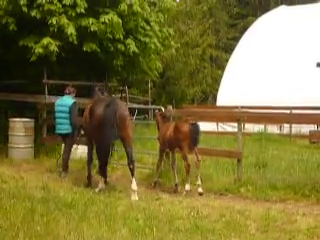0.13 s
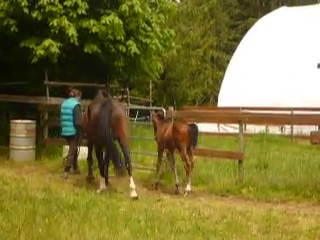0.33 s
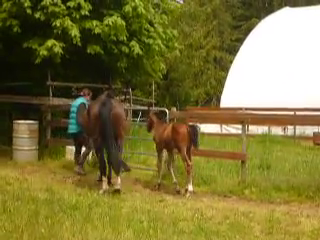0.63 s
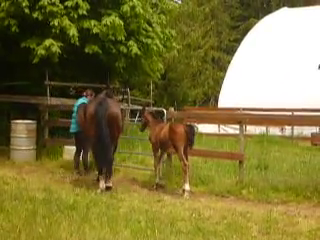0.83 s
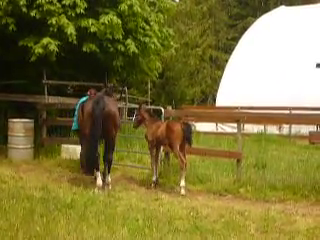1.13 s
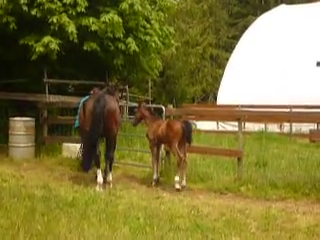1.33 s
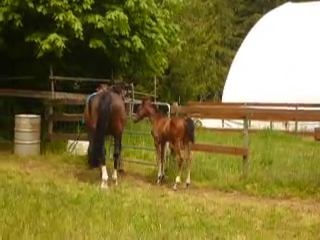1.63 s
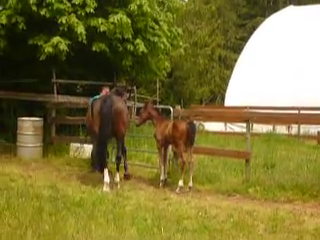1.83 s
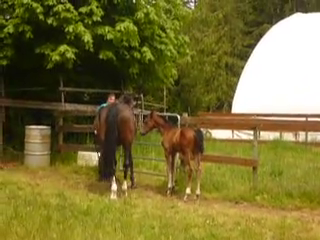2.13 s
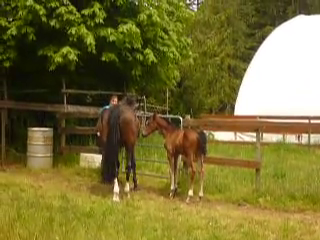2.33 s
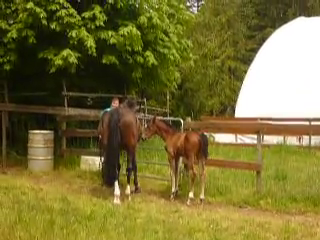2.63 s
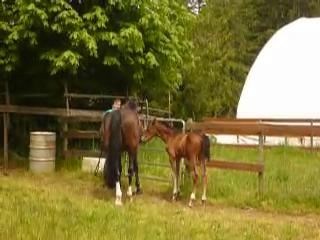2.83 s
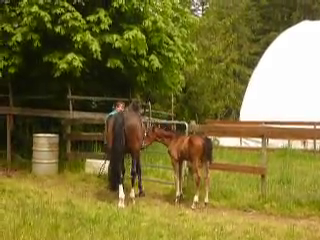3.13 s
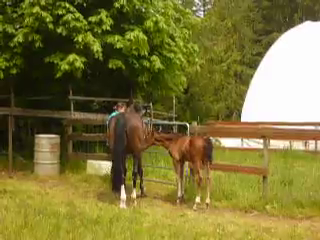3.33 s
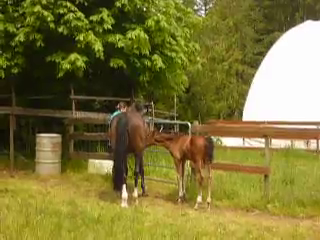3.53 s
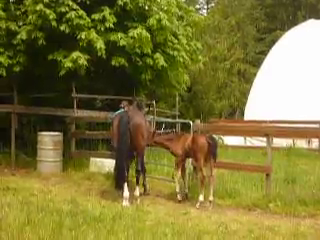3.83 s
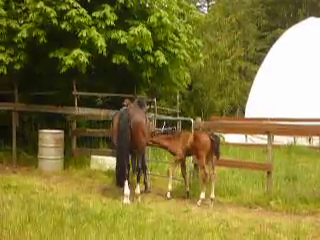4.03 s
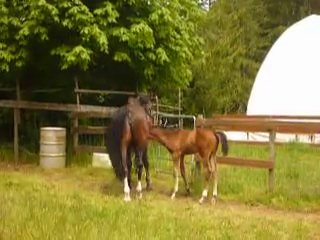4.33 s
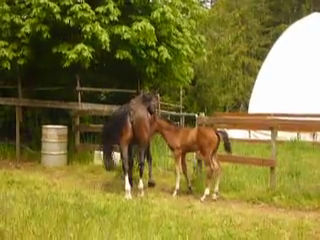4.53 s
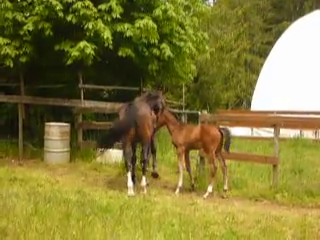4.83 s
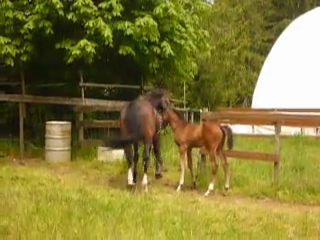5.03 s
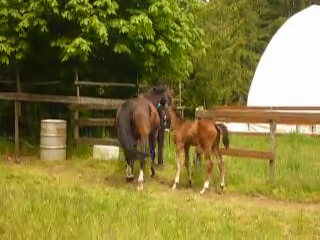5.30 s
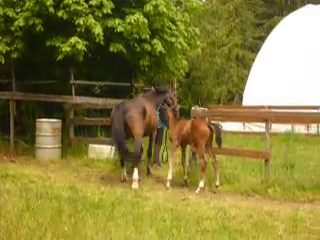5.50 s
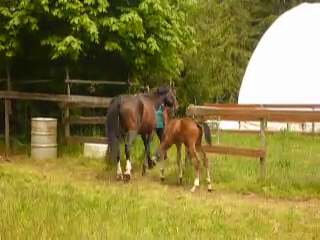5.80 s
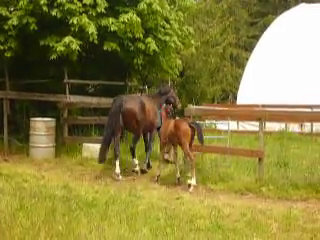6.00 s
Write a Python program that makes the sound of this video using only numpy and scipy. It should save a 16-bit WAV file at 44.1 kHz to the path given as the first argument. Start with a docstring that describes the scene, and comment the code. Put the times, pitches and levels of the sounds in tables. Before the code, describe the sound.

Over steady outdoor hush, two shrill, raspy, shaking horse whinnies sound, with a chain and pipe gate rattling between them and a soft blow last.

```python
"""Over a steady hush of coloured noise, a horse whinnies: a sine squeal over rasping vocal-fold pulses,
both quavering about eight times a second and running out in a slow growl. Sharp ringing ticks follow,
then a gate rattles as noise bursts ring its pipes, with a thin noise hiss running on into a second whinny.
Dull noise knocks fall within that whinny, two more ticks near its end, and last a soft blow of shaped noise.
It is a paddock with thin reflections, heard through a small mono camera microphone."""
import sys
import numpy as np
from scipy import signal
from scipy.fft import rfft, irfft
from scipy.io import wavfile
from scipy.ndimage import uniform_filter1d

SR = 44100
rng = np.random.default_rng(int(sys.argv[2]) if len(sys.argv) > 2 else 0)


def output_pcm(signal):
    """Save a mono or channel-first signal as 16-bit PCM at the path in sys.argv[1].

    Samples are clipped to [-1, 1] before scaling.
    """
    pcm = np.clip(np.atleast_2d(signal).T, -1, 1) * 32767
    wavfile.write(sys.argv[1], SR, np.round(pcm).astype(np.int16))


N = 271700
TIME = np.arange(N) / SR

# In the tables, dB in a colour is relative; other levels are set before trims, swells and the microphone.
# colour of the outdoor hush: f/Hz, level/dB
HUSH_COLOUR = [(28, -51), (50, -36), (90, -24), (130, -14), (200, -5), (340, 1.5), (500, 3), (950, 1),
               (1650, -3), (2400, -5.5), (3600, -6), (5500, -10.5), (7200, -10.5), (8600, -29.5)]
# envelope of the thin hiss: t/s, level/dB
HISS_ENVELOPE = [(2.22, -82), (2.27, -52.5), (2.6, -49.5), (2.95, -50), (3.2, -58), (3.35, -60)]
# colour of the thin hiss: f/Hz, level/dB
HISS_COLOUR = [(60, -54), (1000, -22), (2000, 1.5), (2900, -21), (3800, -4.5), (4500, 0.5), (5050, 0.5),
               (5500, -10), (7000, -34)]
# envelope of the soft blow through the nostrils: t/s, level/dB
BLOW_ENVELOPE = [(5.88, -79), (5.93, -48.5), (5.97, -42.5), (6.01, -44.5), (6.06, -46), (6.16, -46.5)]
# colour of the blow: f/Hz, level/dB
BLOW_COLOUR = [(50, -54), (300, -15), (750, -8.5), (1350, -2), (1700, -10), (2280, 2), (2900, -5),
               (3330, 4.5), (3850, 1.5), (4200, -5), (4600, 1), (5000, -4), (6600, -7.5), (7600, -28)]
# sharp ticks near the microphone: t/s, peak level/dB, centre f/Hz
TICKS = [(1.5625, -37, 6000), (1.703, -25, 5000), (1.721, -21, 5630), (1.7482, -28, 4340),
         (1.7788, -32, 4600), (1.7867, -26.5, 4630), (2.5702, -35, 5900), (5.2057, -21, 6500),
         (5.3581, -28.5, 5810)]
# dull knocks: t/s, level/dB, body decay/s, thump level against the body/dB
KNOCKS = [(3.845, -32, 0.011, -8), (3.859, -39, 0.0072, -9), (3.877, -28, 0.0085, -2.5),
          (3.885, -32.5, 0.0078, -19), (3.893, -33, 0.0068, -23), (3.931, -31.5, 0.0082, -29)]
# colour of the knock body: f/Hz, level/dB
KNOCK_BODY = [(50, -66), (300, -36), (650, -15), (950, 6), (1150, -4), (1600, -1.5), (2300, -8.5),
              (3400, -5.5), (5000, -19.5), (8000, -43)]
# colour of the low thump: f/Hz, level/dB
KNOCK_THUMP = [(40, -53), (120, -42), (200, -1), (420, 0.5), (700, 1), (1500, -26), (6000, -45)]
# gate shaken on its chain: t/s, level/dB, rise/s, decay/s
RATTLES = [(1.789, -45.5, 0.0055, 0.028), (1.86, -41.5, 0.0084, 0.052), (2.301, -44.5, 0.0038, 0.037),
           (2.36, -44, 0.0083, 0.022), (2.4, -37.5, 0.0037, 0.019), (2.48, -47, 0.02, 0.064),
           (2.55, -50.5, 0.0079, .06), (2.773, -43.5, 0.0026, 0.042), (2.835, -40.5, 0.007, 0.054)]
# ringing modes of the gate pipes: f/Hz, t60/s, level/dB
GATE_MODES = [(860, .08, -4), (1310, .1, -4), (1880, .16, -3), (2270, .1, -4), (2650, .16, -4),
              (3280, .32, -3), (3900, .08, -8), (4450, .08, -8)]
# colour of the chain: f/Hz, level/dB
CHAIN_COLOUR = [(50, -52), (200, -26.5), (600, -2.5), (1000, 3), (1500, -0.5), (2200, 4), (3200, 5.5),
                (4600, -1.5), (5400, -2), (7000, -34.5)]
# throat and nose resonances of each whinny: f/Hz, level/dB
FIRST_THROAT = [(40, -60), (90, -31), (170, -22), (300, -28), (600, -25.5), (850, -15.5), (1050, -10),
                (1270, 4), (1550, 3), (1800, 5), (2100, -1.5), (2350, -13), (2580, -6.5), (6000, -48)]
SECOND_THROAT = [(40, -67), (150, -18.5), (300, -30), (500, -13.5), (700, -19.5), (850, -13.5),
                 (1060, -17.5), (1260, 4), (1450, -0.5), (1850, 1), (2080, -1.5), (2280, -3), (2450, -33),
                 (6000, -45.5)]
# rush of air in the nostrils: f/Hz, level/dB
FIRST_AIR = [(60, -65), (1500, -32), (2600, 0), (3150, 4), (3400, -4), (3700, 3), (4000, -9.5), (4400, 5),
             (4780, -12), (5000, -2), (5350, -3.5), (5720, -6), (6000, -20), (7500, -54)]
SECOND_AIR = [(60, -67), (1500, -39), (2700, -2.5), (3150, 2), (3450, 8.5), (3700, 6), (4250, -4),
              (4950, 1), (5400, -8), (5750, -14), (6250, -8), (6800, -10.5), (7300, -9), (8500, -28.5)]
# slow growl as each whinny runs out: t/s, mean pulse f/Hz, level/dB
FIRST_GROWL = [(.8, 170, -50), (1.06, 149.3, -51), (1.19, 110.3, -49.5), (1.245, 105, -42.5),
               (1.31, 93.5, -49.5), (1.37, 96.4, -44.5), (1.44, 85.4, -60)]
SECOND_GROWL = [(4.3, 189.5, -53.5), (4.85, 165, -47.5), (5.15, 155.7, -43.5), (5.29, 164.3, -45.5),
                (5.335, 168.4, -49), (5.365, 175, -43), (5.4, 180, -40), (5.44, 159, -45.5),
                (5.49, 130.1, -58)]
# quavers, each lasting until the next; pitch arches to a crest and sags at both ends:
# start t/s, fold f at the crest/Hz, sag/share of f, flip/share of the quaver,
# squeal level/dB, rasp level/dB, air level/dB
FIRST_QUAVERS = [(-.07, 517.7, 0.13, 0, -35.5, -38.5, -51.5), (.036, 545.4, .11, 0.59, -30, -38, -51.5),
                 (.137, 553.5, .15, .58, -28.5, -35.5, -44), (.243, 542, .15, .3, -29.5, -34.5, -42),
                 (.363, 555.9, .17, 0.52, -29.5, -32.5, -39.5), (.483, 526.6, .13, 0.93, -34.5, -33.5, -40),
                 (.597, 533.2, .16, .63, -32.5, -31.5, -40), (.708, 512.5, .16, 0.9, -38.5, -32.5, -39.5),
                 (.822, 511.5, .17, 1, -39.5, -31.5, -40), (.94, 511.3, .17, 0.16, -48, -31, -42),
                 (1.063, 471.5, 0.13, .9, -50, -31, -44)]
SECOND_QUAVERS = [(2.99, 486, .005, 1, -48, -68, -54), (3.15, 491.4, .01, 1, -48, -56, -47.5),
                  (3.24, 490.4, 0.0097, 1, -44, -42, -45.5), (3.35, 488.4, 0.016, 0.97, -40.5, -39.5, -47),
                  (3.44, 487.7, .05, 0.96, -38, -39.5, -51), (3.555, 483.6, 0.058, 0.99, -37.5, -38.5, -48),
                  (3.675, 482, 0.089, 1, -39.5, -36.5, -43.5), (3.81, 482, .1, 0.97, -38, -37, -42.5),
                  (3.93, 474.3, .13, 0.99, -38, -36, -41), (4.06, 468.3, .11, 0.99, -37.5, -38, -43),
                  (4.182, 470.4, .12, 1, -36.5, -38, -42.5), (4.312, 469.4, .12, 1, -37, -36.5, -41.5),
                  (4.44, 468.6, .13, 0.98, -36.5, -37, -42.5), (4.578, 456.4, 0.16, 1, -38, -39, -44),
                  (4.708, 426.6, .1, 0.97, -40, -40.5, -45.5), (4.838, 414, .12, 0.016, -42.5, -40, -46.5),
                  (4.96, 416, .16, 0, -50, -39.5, -46), (5.085, 397.5, .15, 1, -49, -41, -45),
                  (5.21, 375, .14, 0.89, -56, -41.5, -45.5)]
# course shared by all quavers of a whinny, levels being full-depth swells:
# position/share of the quaver, base roughness/0-1, squeal level/dB, rasp level/dB, air level/dB
FIRST_COURSE = [(.02, .8, -20, -0.5, -7), (.25, .52, -5, 0.5, -2.5), (.5, .33, 1, -1.5, .5),
                (.68, .33, 2, 0.5, 0.5), (.85, 0.61, -9, 2, 0)]
SECOND_COURSE = [(.04, .72, -10, -0.5, -4), (.25, .4, -1, -3, -4.5), (.47, 0.244, 1.5, -1, -1.5),
                 (.66, .45, -5, -0.5, -1.5), (.82, .72, -9.5, 2.5, 3.5)]
# bands cut out by the microphone: f/Hz, width/Hz
NOTCHES = [(2890, 110), (2920, 110), (8030, 1000)]

HUSH_DB = -48  # mean level
BREATHY_DB = 3.5  # turbulence against the pulses at full roughness
JITTER = .115  # rms scatter of the fold rate at full roughness, as a share
GROWL_ROUGH, GROWL_AIR_DB = 0.93, -7.5  # roughness 0-1; puffs of air against the growl
CHEST_HZ, CHEST_WIDTH_HZ, CHEST_DB = 175, 120, -26  # hollow under the growl; width of each of two passes
FULL_SAG = .14  # pitch sag, as a share, at which the level shakes fully
FLIP_DIP_DB, LOCKED_DB = -8, 1  # squeal dip at each change of beat; even beat against strong-weak
EVEN_CLEARS = 0.39  # share of the roughness that an even beat clears at the crest
BLEND_S = .02  # crossfade from one quaver into the next
VOICE_LOW_HZ = 260  # the whinny rolls off below this
TOP_HZ = 8500  # the microphone's upper limit


def undb(db):
    """Turn decibels into gain."""
    return 10 ** (np.asarray(db) / 20)


def unit(x):
    """Scale to rms 1."""
    return x / np.sqrt(np.mean(x ** 2))


def steady(x):
    """Level the short-term rms to 1, keeping the shape of single pulses."""
    power = uniform_filter1d(uniform_filter1d(x ** 2, size=800), size=600)
    return x / np.sqrt(np.abs(power) + 1e-12)


def noise():
    """White noise."""
    return rng.standard_normal(N)


def walk(rate):
    """Smooth random modulation with spread near 1, changing about rate times a second."""
    hold = max(int(SR / rate), 2)
    steps = np.repeat(rng.standard_normal(N // hold + 1), hold)
    return unit(uniform_filter1d(steps, hold)[:N])


def fader(s, db):
    """Ride the gain along a level curve, silent outside it."""
    return undb(np.interp(TIME, s, db)) * (TIME >= s[0]) * (TIME <= s[-1])


def colour(x, shape, size=4096):
    """Minimum-phase EQ through points of f/Hz and level/dB."""
    hz, db = np.transpose(shape)
    grid = np.maximum(np.arange(size // 2 + 1) * SR / size, 1)
    level = np.interp(np.log(grid), np.log(hz), db)
    cepstrum = irfft(np.log(undb(level)))
    # fold the cepstrum forward so that the filter is causal
    cepstrum[1:size // 2] *= 2
    cepstrum[size // 2 + 1:] = 0
    impulse = irfft(np.exp(rfft(cepstrum)))
    return signal.fftconvolve(x, impulse)[:len(x)]


def resonate(x, hz, width):
    """One resonance, gain 1 at its centre."""
    return signal.lfilter(*signal.iirpeak(hz, hz / width, fs=SR), x)


def burst(s, rise, decay):
    """Envelope of a blow: linear rise, exponential fall."""
    age = np.maximum(TIME - s, 0)
    fall = np.maximum(age - rise, 0) / decay
    return np.minimum(age / rise, 1) * np.exp(-np.minimum(fall, 20))


def gust(envelope, shape):
    """Noise that follows an rms envelope and then takes a colour."""
    return colour(envelope * noise(), shape) / np.std(colour(noise(), shape))


def hush():
    """Even outdoor air: coloured noise with a slight, slow swell."""
    return undb(HUSH_DB + 0.71 * walk(0.61)) * unit(colour(noise(), HUSH_COLOUR))


def paddock(x, wet_db, t60):
    """Thin, scattered reflections from fence and trees, as a decaying noise tail."""
    age = TIME[:SR // 2]
    tail = rng.standard_normal(len(age)) * undb(-60 * age / t60)
    tail = tail * (age > .012)  # pre-delay in s
    tail = tail / np.sqrt(np.sum(tail ** 2))
    return x + undb(wet_db) * signal.fftconvolve(x, tail)[:N]


def thin_hiss():
    """Thin noise hiss that rides its own level curve."""
    return gust(fader(*np.transpose(HISS_ENVELOPE)), HISS_COLOUR)


def nostril_blow():
    """Breath turbulence, coloured by the nostrils."""
    return gust(fader(*np.transpose(BLOW_ENVELOPE)), BLOW_COLOUR)


def ticks():
    """Single snaps: a click and short noise excite a resonance for about a millisecond."""
    out = np.zeros(N)
    for s, db, hz in TICKS:
        age = np.arange(256) / SR
        grit = rng.standard_normal(len(age)) * np.exp(-age / 0.00051)
        push = (age == 0) + 0.31 * grit
        snap = resonate(resonate(push, hz, 2000), hz, 2200)
        start = int(s * SR)
        out[start:start + len(age)] += undb(db) * snap / np.abs(snap).max()
    return out


def knocks():
    """A quick cluster of dull noise blows, with the strongest low thump under the heaviest."""
    body = 0
    thump = 0
    for s, db, decay, low_db in KNOCKS:
        body = body + undb(db) * burst(s, 0.0012, decay)
        thump = thump + undb(db + low_db) * burst(s, 0.0022, 1.52 * decay)
    return gust(body, KNOCK_BODY) + undb(-6.5) * gust(thump, KNOCK_THUMP)


def gate():
    """The chain chatters as ragged noise against the pipes, whose resonances ring on."""
    shake = sum(undb(db) * burst(s, rise, decay) for s, db, rise, decay in RATTLES)
    chatter = unit(noise() * undb(3.1 * walk(500)))
    pipes = 0
    for hz, t60, db in GATE_MODES:
        width = np.log(1000) / (np.pi * t60)
        makeup = np.sqrt(SR / (np.pi * width))  # a narrow mode passes little noise
        pipes = pipes + undb(db) * makeup * resonate(shake * chatter, hz, width)
    chain = shake * unit(colour(chatter, CHAIN_COLOUR))
    return undb(-1.0) * chain + undb(-9.0) * pipes


def folds(hz, rough, doubling, shimmer_db):
    """A pulse each time the folds close; strong and weak alternate, roughness scatters time and size."""
    jittered_hz = hz * (1 + JITTER * rough ** 2 * walk(260))
    phase = np.cumsum(np.maximum(jittered_hz, 20)) / SR
    at = np.flatnonzero(np.diff(np.floor(phase)) > 0)
    # share each pulse between two samples to place it finely
    late = (np.ceil(phase[at]) - phase[at]) / (phase[at + 1] - phase[at])
    size = undb(shimmer_db * rough[at] * np.tanh(noise()[:len(at)]))
    size *= 1 - np.clip(doubling[at], 0, 1) * (np.arange(len(at)) % 2)
    pulses = np.zeros(N)
    pulses[at] += size * (1 - late)
    pulses[at + 1] += size * late
    return pulses, phase


def closures(hz, rough, doubling, shimmer_db, throat):
    """Fold pulses and their puffs of air ring the throat; gives rasp, pulses, puffs and fold phase."""
    pulses, phase = folds(hz, rough, doubling, shimmer_db)
    pulses = steady(pulses)
    puff_decay = np.exp(-1 / (.0022 * SR))  # 2.2 ms
    puffs = steady(signal.lfilter([1], [1, -puff_decay], pulses))
    turbulence = steady((puffs + 0.61) * noise())
    rasp = steady(colour(pulses + undb(BREATHY_DB) * rough * turbulence, throat))
    return rasp, pulses, puffs, phase


def growl(curve, throat, air_shape, shimmer_db):
    """The slack folds flap slowly, one throat pulse and one puff at a time."""
    s, hz, db = np.transpose(curve)
    pulse_hz = np.interp(TIME, s, hz)
    rough = np.full(N, GROWL_ROUGH)
    rasp, pulses, puffs, _ = closures(pulse_hz, rough, np.zeros(N), shimmer_db, throat)
    chest = resonate(pulses, CHEST_HZ, CHEST_WIDTH_HZ)
    chest = unit(resonate(chest, CHEST_HZ, CHEST_WIDTH_HZ))
    air = unit(colour(puffs * noise(), air_shape))
    return fader(s, db) * (rasp + undb(CHEST_DB) * chest + undb(GROWL_AIR_DB) * air)


def blend(x):
    """Smooth the step from one quaver to the next."""
    return uniform_filter1d(x, size=int(BLEND_S * SR))


def quavers(table, end, course, gap_db, gap_narrowness, fatigue, lean, half_multiple):
    """Pitch, roughness and gains; as the lungs empty the voice grows hoarser and the gaps deepen."""
    starts, *columns = np.transpose(table)
    count = np.interp(TIME, np.append(starts, end), np.arange(len(starts) + 1))
    which = np.minimum(count.astype(int), len(starts) - 1)
    share = count - which  # position within the quaver
    spent = count / len(starts)  # progress through the whinny
    crest_hz, sag, flip, *levels = (column[which] for column in columns)

    # lean over 1: a slow scoop up and a quick fall
    trough = np.cos(np.pi * share ** lean) ** 2
    fold_hz = blend(crest_hz * (1 - sag * trough))
    # the beat is strong-weak before the flip and nearly even after it
    even = uniform_filter1d(1. * (share > flip), size=200)
    # the squeal sits on a half multiple and jumps up by half the fold rate
    squeal_hz = fold_hz * (half_multiple + even / 2)

    marks, *shapes = np.transpose(course)
    rough, *swells = (np.interp(share, marks, shape, period=1) for shape in shapes)
    rough = rough + fatigue * spent ** 2
    rough = np.clip(rough * (1 - EVEN_CLEARS * even * (1 - trough)), 0, 1)

    depth = np.minimum(sag / FULL_SAG, 1)  # a shallow quaver hardly shakes the level
    gap = gap_db * spent ** 3 * trough ** gap_narrowness
    sounding = (TIME >= starts[0]) & (TIME < end)
    gains = []
    for db, swell in zip(levels, swells):
        gains.append(blend(undb(db) * sounding).clip(0) * undb(depth * swell + gap))
    locked = blend(even)
    gains[0] = gains[0] * undb(FLIP_DIP_DB * np.sin(np.pi * locked) + LOCKED_DB * (locked - .5))
    return fold_hz, squeal_hz, even, rough, gains


def whinny(voice, throat, air_shape, doubling, shimmer_db, waver, flutter, bend,
           overtone_db, shrill_db, rush_db):
    """A sine squeal, chopped and bent by the strong-weak fold beat, over throat rasp and puffs of air."""
    fold_hz, squeal_hz, even, rough, (squeal_gain, fold_gain, air_gain) = voice
    uneven = doubling * (1 - .8 * even)
    rasp, pulses, puffs, phase = closures(fold_hz, rough, uneven, shimmer_db, throat)
    lead = squeal_gain / (squeal_gain + fold_gain + 1e-12)  # the squeal's share of the voice

    # the strong-weak beat runs at half the fold rate
    beat = (1 - even) * (1 - lead)
    wavering_hz = squeal_hz * (1 + waver * rough ** 2 * walk(400))
    turn = 2 * np.pi * np.cumsum(wavering_hz) / SR - bend * beat * np.sin(np.pi * phase)
    chop = 1 + flutter * beat * np.cos(np.pi * phase)
    # a ragged edge two octaves up
    shrill = undb(shrill_db) * np.sin(4 * turn + 1.9 * walk(900))
    squeal = np.sqrt(2) * (np.sin(turn) + shrill) * chop

    # the nostrils pass the overtones of whichever voice leads, and more turbulence as the voice breaks up
    overtones = (np.sin(2 * turn) + .5 * np.sin(3 * turn)) * chop
    rush = rough * (puffs + 0.46) * noise()
    nasal = undb(overtone_db) * lead ** 2 * overtones
    nasal = nasal + (1 - lead) * (1 - rough) * pulses + undb(rush_db) * rush
    air = steady(colour(nasal, air_shape))

    low_cut = signal.butter(2, VOICE_LOW_HZ, "high", fs=SR, output="sos")
    return signal.sosfilt(low_cut, squeal_gain * squeal + fold_gain * rasp + air_gain * air)


def scene():
    """Mix the sources to one microphone; ticks, hiss and hush stay free of the reflections."""
    first_voice = quavers(FIRST_QUAVERS, 1.174, FIRST_COURSE, gap_db=-18, gap_narrowness=1.15,
                          fatigue=.2, lean=1.12, half_multiple=2.5)
    second_voice = quavers(SECOND_QUAVERS, 5.315, SECOND_COURSE, gap_db=-7, gap_narrowness=4,
                           fatigue=.01, lean=.93, half_multiple=3.5)
    first = whinny(first_voice, FIRST_THROAT, FIRST_AIR, doubling=0.46, shimmer_db=5, waver=0.0704,
                   flutter=0.2, bend=0.092, overtone_db=-13, shrill_db=-34, rush_db=-0.5)
    second = whinny(second_voice, SECOND_THROAT, SECOND_AIR, doubling=0.54, shimmer_db=7.5, waver=.08,
                    flutter=0.81, bend=0.28, overtone_db=-8.5, shrill_db=-17, rush_db=-0.5)
    first_growl = growl(FIRST_GROWL, FIRST_THROAT, FIRST_AIR, shimmer_db=4)
    second_growl = growl(SECOND_GROWL, SECOND_THROAT, SECOND_AIR, shimmer_db=11)
    horse = first + second + first_growl + second_growl + nostril_blow()
    distant = paddock(horse + gate() + knocks(), wet_db=-16, t60=.35)
    mono = distant + ticks() + thin_hiss() + hush()
    return np.array([mono, mono])


def record(dry):
    """The microphone notches out narrow bands and cuts the top steeply."""
    for hz, width in NOTCHES:
        dry = signal.lfilter(*signal.iirnotch(hz, hz / width, fs=SR), dry)
    return signal.sosfilt(signal.ellip(8, .2, 70, TOP_HZ, fs=SR, output="sos"), dry)


dry = scene()
out = record(dry)
output_pcm(out)
```